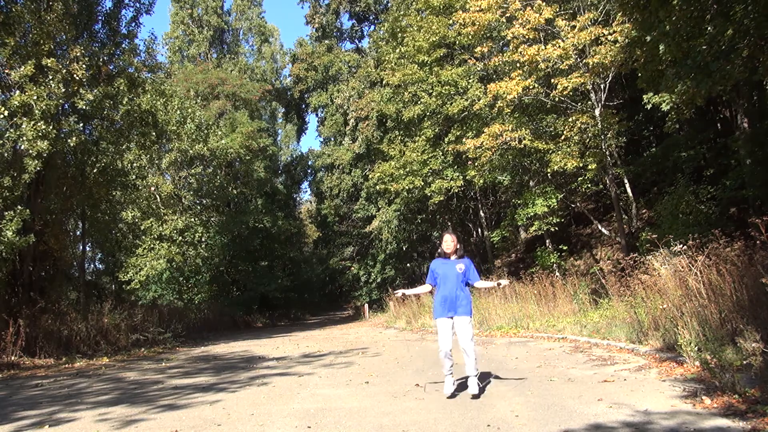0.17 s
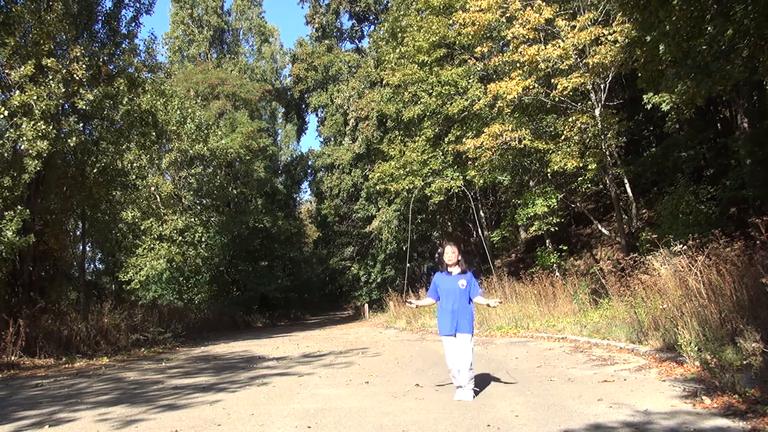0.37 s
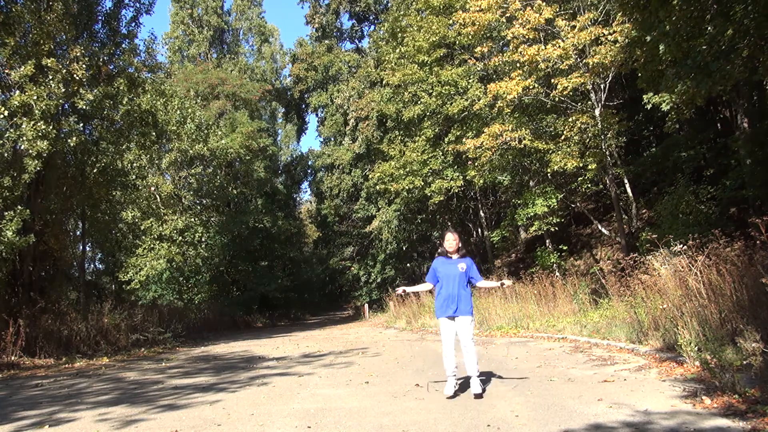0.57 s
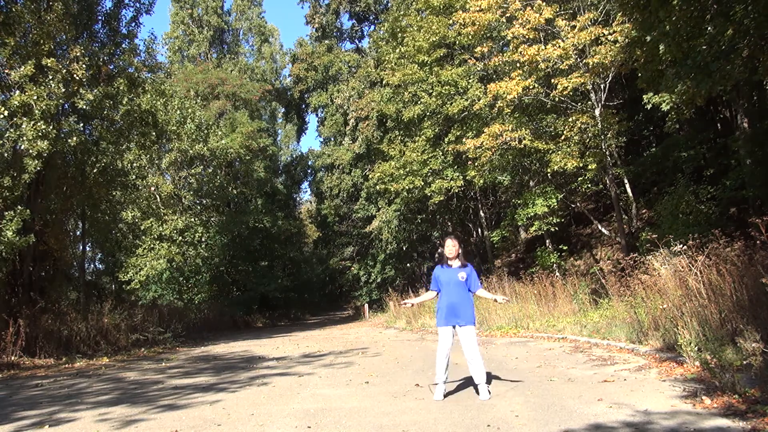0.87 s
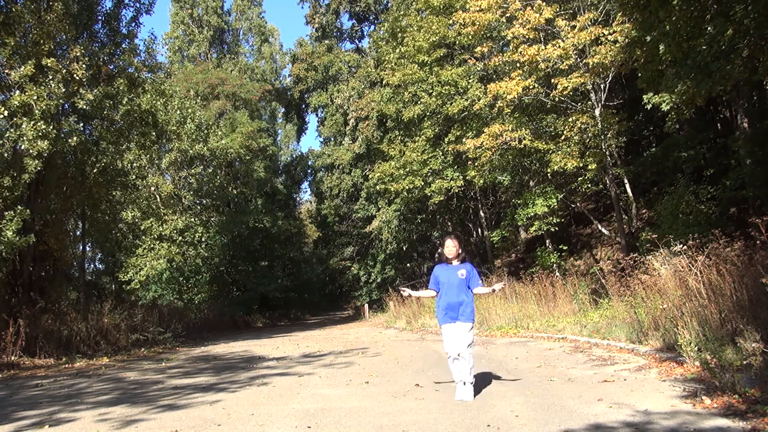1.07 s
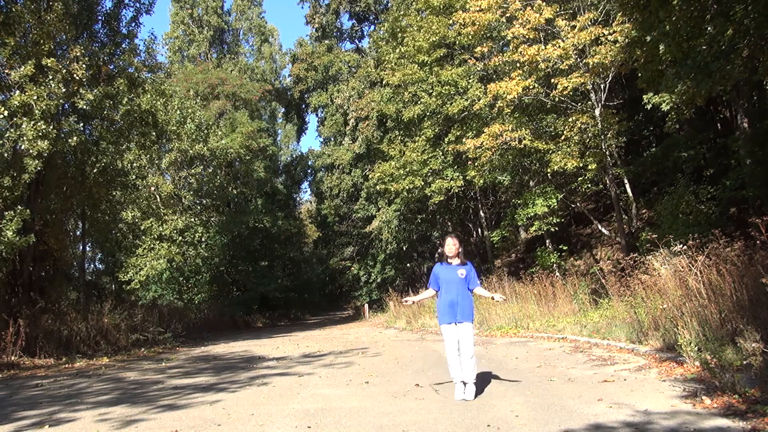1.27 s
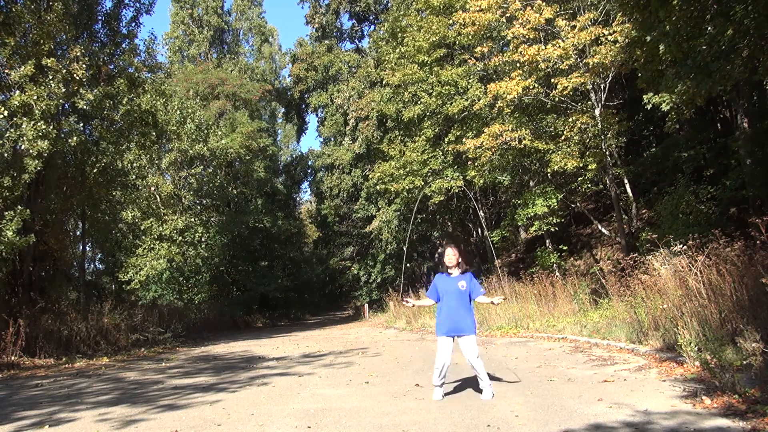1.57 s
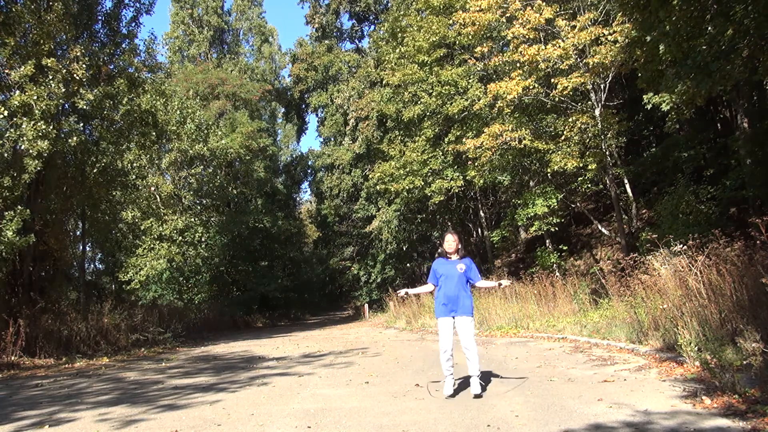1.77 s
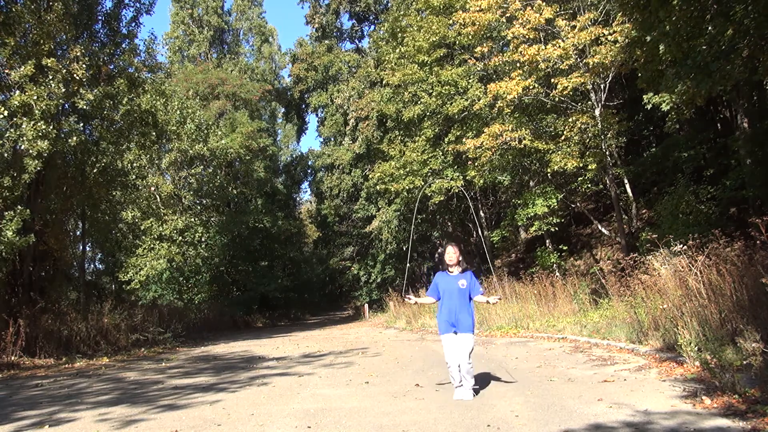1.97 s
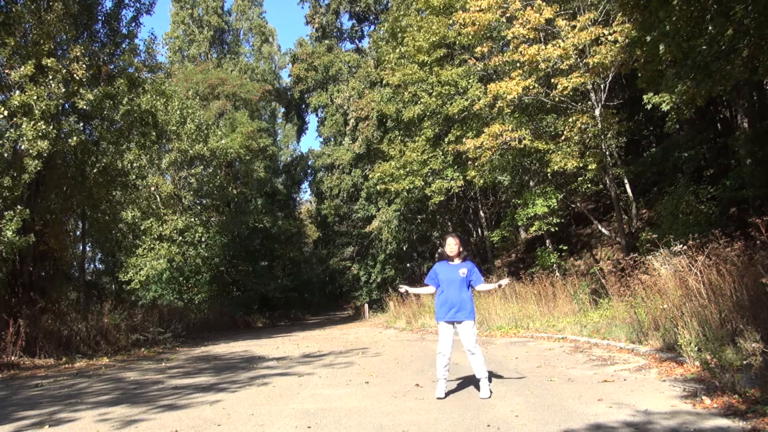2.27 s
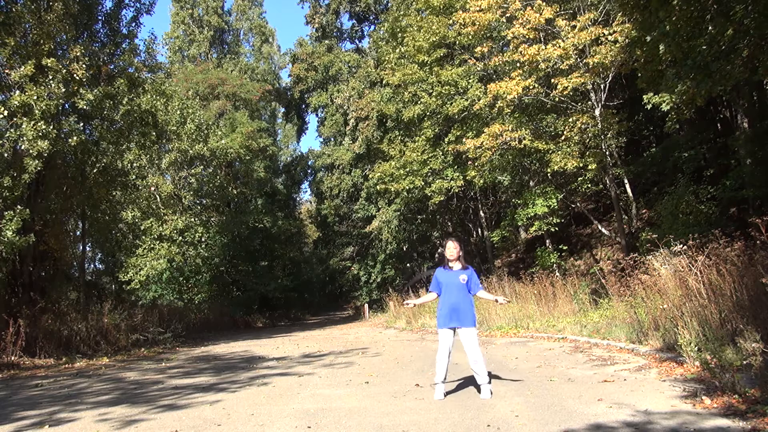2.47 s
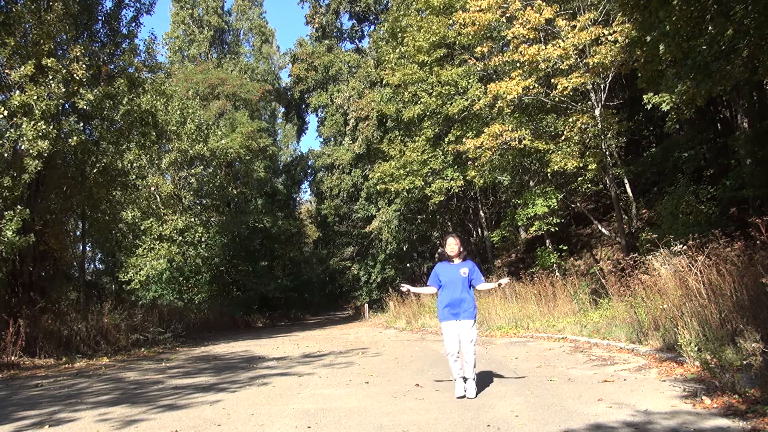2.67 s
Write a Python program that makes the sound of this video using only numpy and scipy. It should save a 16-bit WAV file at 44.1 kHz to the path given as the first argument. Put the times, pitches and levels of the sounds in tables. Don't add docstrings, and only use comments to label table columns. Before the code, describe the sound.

A skipping rope cracks on paving at about 0.17, 0.58, 0.98, 1.39, 1.79, 2.21 and 2.60 seconds, the fourth slap softest. Each is bright and short, with a tiny rattle and a faint wash from trees. The rope whistles waveringly between slaps; shoes tap, scuff and thud softly roughly 0.13 seconds after most slaps, strongest near 1.93. Low hum, leaves and slight hiss lie beneath; the right side is louder.

```python
import sys
import numpy as np
from scipy import signal
from scipy.fft import rfft, irfft
from scipy.io import wavfile

SR = 44100
rng = np.random.default_rng(int(sys.argv[2]) if len(sys.argv) > 2 else 0)


def attenuation_scalar(level_db):
    decades = np.asarray(level_db, float) / 20
    return 10 ** decades


def wrap_up_sound(samples):
    columns = np.atleast_2d(samples).T
    tamed = np.clip(columns, -1, 1)
    steps = np.round(tamed * 32767).astype(np.int16)
    wavfile.write(sys.argv[1], SR, steps)


N = 124362


def rms_one(x):
    return x / np.sqrt(np.mean(x ** 2) + 1e-20)


def at_hz(points, hz):
    table = np.array(points)
    return np.interp(np.log(hz), np.log(table[:, 0]), table[:, 1])


def drift(hz):
    r = np.exp(-2 * np.pi * hz / SR)
    wander = signal.lfilter([1], [1, -2 * r, r * r], rng.standard_normal(N + SR))
    return rms_one(wander[SR:])


def band(x, low_hz, high_hz):
    sos = signal.butter(2, [low_hz, min(high_hz, 0.45 * SR)], "band", fs=SR, output="sos")
    return signal.sosfilt(sos, x)


def ring(x, hz, width_hz):
    r, w = np.exp(-np.pi * width_hz / SR), 2 * np.pi * hz / SR
    return signal.lfilter([0, np.sin(w)], [1, -2 * r * np.cos(w), r * r], x + 1e-18)


# frequency in Hz, level in dB per Hz.
AIR_SPECTRUM = [(25, -16.5), (60, -11.5), (256, -10.5), (900, -13), (1940, -18.5), (8360, -42),
                (16000, -36.5)]
# frequency in Hz, correlation from -1 to 1.
AIR_LIKENESS = [(25, .4), (70, .55), (250, .96), (8000, .9)]


def air():
    AIR_DB, TOGETHER_DB, PATCH_DB = -49.5, 1.2, 1.53
    out, together = 0, drift(1.8)
    edges = 22 * 2 ** np.arange(0, 9.6, 0.5)
    white = rng.standard_normal((2, 2, N))
    for k, (low, high) in enumerate(zip(edges, edges[1:])):
        mid, side = band(white[k % 2], low, high)
        hz = np.sqrt(low * high)
        alike = np.clip(at_hz(AIR_LIKENESS, hz), -1, 1)
        stereo = np.sqrt(1 + alike) * mid + np.sqrt(1 - alike) * side * [[1], [-1]]
        level_db = at_hz(AIR_SPECTRUM, hz) + TOGETHER_DB * together + PATCH_DB * drift(11)
        out = out + attenuation_scalar(level_db) * stereo
    return attenuation_scalar(AIR_DB) * rms_one(out)


def trees(hits):
    NEAR_DB, NEAR_T60_S = -6, 0.022
    FAR_DB, FAR_T60_S = -27, 0.79
    LOW_HZ, HIGH_HZ, GRAIN_DB = 3100, 9547, 2.5
    t = np.arange(SR) / SR
    fade = attenuation_scalar(NEAR_DB - 60 * t / NEAR_T60_S) + attenuation_scalar(FAR_DB - 60 * t / FAR_T60_S)
    fade = fade * (t > 0.004) / 10
    power = signal.fftconvolve(band(hits, LOW_HZ, HIGH_HZ) ** 2, fade ** 2)[:N]
    level = np.sqrt(np.abs(power))
    mid, side = rng.standard_normal((2, N))
    wash = band(mid + 0.48 * side * [[1], [-1]], LOW_HZ, HIGH_HZ)
    return level * attenuation_scalar(GRAIN_DB * drift(120)) * wash


def ticks():
    PER_S, TICK_DB = 45, -33
    sizes = attenuation_scalar(TICK_DB + 4 * np.minimum(rng.exponential(1, N), 2))
    sizes = sizes * (rng.random(N) < PER_S / SR)
    return band(sizes * rng.choice([-1, 1], N), 830, 2800)


# start in seconds, length in
# seconds, level in dB.
SCUFF_EVENTS = [
    (-0.014, 0.21, -55.5),
    (0.29, 0.039, -52.5),
    (0.751, 0.054, -57),
    (1.095, 0.051, -55.5),
    (1.486, 0.072, -53),
    (1.884, 0.061, -50),
    (2.285, 0.13, -80),
    (2.723, 0.049, -64.5),
]


def scuffs():
    t = np.arange(N) / SR
    grains = rng.standard_normal(N) * attenuation_scalar(4 * drift(250))
    drag = 0
    for s, length, db in SCUFF_EVENTS:
        drag = drag + attenuation_scalar(db) * np.sin(np.pi * np.clip((t - s) / length, 0, 1))
    return drag * rms_one(band(grains, 398, 6400))


# start in seconds, peak level in dB, reference pitch in Hz (the push settles at 0.7 of
THUD_EVENTS = [(0.303, -35.5, 265), (0.315, -37, 263), (0.723, -35.5, 310), (0.7348, -29.5, 345),
               (1.109, -36.5, 260), (1.5354, -30.5, 281), (1.903, -29, 252.7), (1.9317, -26.5, 287),
               (2.338, -30, 291.2), (2.3498, -27, 316), (2.741, -30.5, 330), (2.754, -33, 255.8)]


def thuds():
    START_SHARE, FALL_S, SETTLE_SHARE, RINGS = 3.5, 0.0013, 0.7, 1.3
    out, t = np.zeros(N + SR), np.arange(2000) / SR
    for s, db, hz in THUD_EVENTS:
        cycles = SETTLE_SHARE * hz * (t + START_SHARE * FALL_S * (1 - np.exp(-t / FALL_S)))
        i = int(s * SR)
        out[i:i + len(t)] -= attenuation_scalar(db + 3.5 - 10 * t * hz / RINGS) * np.sin(2 * np.pi * cycles)
    return band(out[:N], 87, 2300)


def knocks(rows, cycles):
    ROUGH_DB = -8
    out, noise = np.zeros(N + SR), rng.standard_normal((len(rows), 4000))
    for (s, db, hz), rough in zip(rows, noise):
        u = np.arange(min(int(3 * cycles / hz * SR), 4000)) * hz / SR
        i = int((s - 0.59 / hz) * SR)
        burst = rms_one(band(rough, 1.2 * hz, 1.27 * hz))[:len(u)]
        wave = np.sin(2 * np.pi * u) + attenuation_scalar(ROUGH_DB) * burst
        out[i:i + len(u)] += attenuation_scalar(db + 7.5 - 30 * u / cycles) * (1 - np.exp(-u / 0.27)) * wave
    return out[:N]


# peak time in seconds, peak level in dB, pitch in Hz.
TAP_EVENTS = [(0.0631, -30, 2270), (.3022, -40.5, 2320), (.3158, -36, 1480), (.3736, -40, 2150),
              (.3975, -40.5, 1700), (.4614, -38, 2406), (0.5097, -40.5, 1706), (0.7068, -39, 2510),
              (0.7239, -32.5, 2230), (0.7736, -27.5, 2075), (.7772, -33, 1587), (0.7824, -38.5, 2430),
              (.8694, -63, 1675), (1.0706, -37.5, 1723), (1.1127, -36, 2128), (1.197, -36.5, 1677),
              (1.4556, -48.5, 2000), (1.4871, -27.5, 1890), (1.4953, -34, 2315), (1.4975, -35, 2360),
              (1.5028, -40, 2020), (1.5046, -35, 2520), (1.5091, -29, 2220), (1.5132, -28, 2270),
              (1.5265, -34.5, 1570), (1.5361, -33, 1580), (1.5633, -39, 1910), (1.6468, -34.5, 2430),
              (1.8176, -34.5, 1953), (1.8582, -35, 1940), (1.9029, -28, 1730), (1.9213, -37, 2300),
              (1.9332, -19.5, 1630), (2.0517, -33, 1767), (2.2858, -39.5, 2182), (2.2911, -31.5, 2002),
              (2.3377, -32.5, 1860), (2.3487, -36.5, 2583), (2.5832, -34.5, 1513), (2.6359, -22.5, 1292),
              (2.7393, -32, 1720), (2.7543, -31.5, 1483), (2.758, -35, 1711)]
# peak time in seconds, peak level in dB, pitch in Hz.
GRIT_EVENTS = [(.287, -39, 6480), (0.2958, -33.5, 9450), (.2978, -36, 6192), (0.3343, -38, 7165),
               (.7239, -40, 5970), (.7824, -43, 5535), (1.4953, -37, 6540), (1.5265, -50, 4500),
               (1.5361, -47, 6500), (1.9028, -35, 5684), (1.9213, -35.5, 6400), (1.9328, -27.5, 6100),
               (2.3376, -35, 5500), (2.3487, -33.5, 6296), (2.7354, -36, 9560), (2.7393, -38.5, 6584)]


def feet():
    return knocks(TAP_EVENTS, cycles=3.8) + knocks(GRIT_EVENTS, cycles=2.8) + thuds() + scuffs()


SLAP_TIMES = [
    -.23,
    .1745,
    .581,
    .9775,
    1.391,
    1.7914,
    2.2092,
    2.6005,
    3.0,
]
# share of the turn from 0 to 1, pitch in Hz, level in dB.
TURN_TONE = [(0, 595.2, -47.5), (0.058, 507.6, -53.5), (0.219, 494.8, -49), (0.448, 573.8, -49.5),
             (0.62, 530.2, -54.5), (.78, 586.9, -47), (1, 612.7, -45.5)]
# peak time in seconds, peak level in dB, pitch in Hz, length in seconds.
EDDY_SWELLS = [(0.007, -33.5, 541.7, 0.014), (0.048, -38.5, 525, 0.015), (0.075, -30.5, 592.7, 0.02),
               (0.104, -29.5, 622, 0.0076), (0.138, -33, 581.4, 0.022), (0.157, -28, 705, 0.0068),
               (0.251, -37.0, 496.0, 0.022), (0.287, -39.5, 532, 0.0087), (0.356, -39.5, 620, 0.011),
               (0.462, -39, 542.2, 0.013), (0.489, -30.5, 622, 0.006), (0.551, -29.0, 576, 0.01),
               (0.628, -42, 485.4, 0.012), (0.679, -34, 512.2, 0.015), (0.871, -40.5, 562.2, 0.029),
               (0.897, -41, 585.2, 0.013), (0.939, -31.5, 555, 0.022), (0.97, -36.5, 600.5, 0.014),
               (1.065, -37.0, 521.6, 0.014), (1.092, -42, 505.7, 0.018), (1.196, -35.5, 536.0, 0.0085),
               (1.245, -48, 523, 0.032), (1.283, -40, 542.2, 0.015), (1.316, -43, 609, 0.015),
               (1.369, -33.5, 591.6, 0.0083), (1.393, -35, 547, 0.018), (1.486, -35, 521.2, 0.017),
               (1.509, -38, 523.5, 0.025), (1.593, -38.0, 568, 0.013), (1.61, -33.5, 591, 0.0061),
               (1.72, -33.5, 598.2, 0.013), (1.743, -36.5, 554.3, 0.01), (1.764, -33.5, 593.6, 0.021),
               (1.787, -39, 605.3, 0.03), (1.848, -38.5, 496.7, 0.034), (1.882, -39, 526.5, 0.022),
               (1.912, -31, 531, 0.011), (2.1, -33.5, 545, 0.021), (2.129, -39, 620, 0.013),
               (2.153, -40.5, 576.3, 0.028), (2.194, -40.5, 624, 0.027), (2.275, -42, 504.7, 0.073),
               (2.321, -35.5, 523.7, 0.015), (2.374, -40.5, 555.0, 0.027), (2.423, -35.5, 571, 0.0055),
               (2.517, -35.5, 584.4, 0.025), (2.573, -30, 604.4, 0.023), (2.666, -33.5, 543, 0.0091),
               (2.687, -32.5, 504, 0.021), (2.786, -40.5, 554.6, 0.016)]


def whistle():
    TONE_WIDTH_HZ, SWISH_DB, BRIGHT_SWISH_DB, WISP_DB = 49.4, -14, -17.5, 2.4
    WOBBLE_RADIANS, SWELL_OVERTONE_DB, LINK_DB = 0.62, -18, 3
    t = np.arange(N) / SR
    turn = np.interp(t, SLAP_TIMES, np.arange(len(SLAP_TIMES))) % 1
    share, hz, db = np.transpose(TURN_TONE)
    pitch, level = np.interp(turn, share, hz), attenuation_scalar(np.interp(turn, share, db))
    phase = 2 * np.pi * np.cumsum(pitch) / SR

    tone = 0
    for ratio, partial_db in ((1, 0), (2, -18), (1.17, -9)):
        width = TONE_WIDTH_HZ * ratio
        blurred = drift(width) * np.cos(ratio * phase) + drift(width) * np.sin(ratio * phase)
        tone = tone + attenuation_scalar(partial_db) * blurred
    swish = attenuation_scalar(SWISH_DB + WISP_DB * drift(14)) * rms_one(band(rng.standard_normal(N), 300, 3300))
    swish += attenuation_scalar(BRIGHT_SWISH_DB) * rms_one(band(rng.standard_normal(N), 2300, 9900))

    wobble = WOBBLE_RADIANS * drift(60)
    s, db, hz, length = np.transpose(EDDY_SWELLS)[:, :, None]
    spread = length * np.where(t < s, 0.48, 0.62)
    power = attenuation_scalar(2 * db) * np.exp(-((t - s) / spread) ** 2)
    link = attenuation_scalar(LINK_DB) * level ** 2
    total = power.sum(axis=0) + link
    glide_hz = ((power * hz).sum(axis=0) + link * pitch) / total
    glide = 2 * np.pi * np.cumsum(glide_hz) / SR
    orderly = np.sin(glide + wobble) + attenuation_scalar(SWELL_OVERTONE_DB) * np.sin(2 * glide + 3 * wobble)
    return level * (tone + swish) + np.sqrt(total) * orderly


# time in seconds, peak level in dB.
ROPE_CONTACTS = [(0.1745, -3), (0.1753, -17), (0.1762, -16), (0.1771, -21), (0.1782, -19), (0.179, -13),
                 (0.1795, -20), (0.1829, -20), (0.1844, -18), (0.1856, -25), (0.581, -3), (0.5828, -16),
                 (0.5921, -23), (0.5955, -24), (0.9776, -4), (0.978, -12), (0.9787, -14), (0.98, -18),
                 (0.9805, -12), (0.982, -23), (0.9836, -16), (0.986, -20), (1.3912, -10), (1.3919, -11),
                 (1.3929, -16), (1.3948, -20), (1.3963, -18), (1.3977, -18), (1.3982, -18), (1.3995, -21),
                 (1.4184, -26), (1.4191, -18), (1.7915, -4), (1.7922, -19), (1.7932, -19), (1.794, -20),
                 (1.7956, -21), (1.7966, -14), (1.798, -22), (1.7995, -22), (1.8005, -18), (1.8021, -11),
                 (2.2093, -7), (2.2103, -18), (2.2108, -17), (2.2121, -18), (2.2127, -22), (2.2132, -20),
                 (2.2161, -24), (2.2171, -24), (2.2223, -26), (2.2235, -21), (2.6007, -3), (2.6019, -7),
                 (2.6027, -20), (2.6045, -19), (2.6076, -16), (2.6082, -20), (2.6119, -25), (2.6252, -31)]
# length in seconds, level in dB, crack pitch in Hz, crack width in Hz,
# body pitch in Hz.
SLAP_RATTLE = [
    (0.013, -20.5, 7060, 3500, 3900),
    (0.0095, -21.5, 7560, 2700, 2860),
    (0.0067, -12.5, 7200, 3900, 1900),
    (0.01, -22.5, 6830, 2300, 3850),
    (0.014, -25.5, 7920, 2250, 4900),
    (0.014, -25, 7200, 3830, 3400),
    (0.0079, -15.5, 7700, 2540, 2450),
]


def slaps():
    CRACK_DB, BODY_DB, BODY_WIDTH_HZ, CONTACT_LOSS_DB = 3, -10.5, 2300, 2
    RATTLE_PER_S, FADE_DB, SPREAD_DB = 8000, 8, 3
    t, hits, out = np.arange(N) / SR, np.zeros(N), 0
    sizes = attenuation_scalar(SPREAD_DB * np.minimum(rng.exponential(1, N), 3) - 6)
    sizes = sizes * (rng.random(N) < RATTLE_PER_S / SR) * rng.choice([-1, 1], N)
    s, db = np.transpose(ROPE_CONTACTS)
    hits[(s * SR).astype(int) - 4] = attenuation_scalar(db - CONTACT_LOSS_DB * (db < -9))
    for start, (length, db, hz, width_hz, body_hz) in zip(SLAP_TIMES[1:], SLAP_RATTLE):
        share = (t - start) / length
        fade_db = FADE_DB * np.clip(share, 0, 1) + 20 * np.clip(share - 1, 0, 4)
        onset = (t > start - 0.002) * np.where(share > 0, 1, 0.2)
        clicks = sizes * attenuation_scalar(db - fade_db - 6) * onset
        clicks = (clicks + hits) * (abs(t - start) < 0.1)
        crack = ring(clicks, hz, width_hz)
        out = out + crack + attenuation_scalar(BODY_DB) * ring(clicks, body_hz, BODY_WIDTH_HZ)
    return -attenuation_scalar(CRACK_DB) * band(band(out, 1320, 10800), 1330, 13400)


def scene():
    hits = slaps() + feet() + ticks()
    return hits + whistle() + trees(hits) + air()


def top_cut(x):
    return signal.sosfilt(signal.butter(12, 16480, fs=SR, output="sos"), x)


# frequency in Hz, level in dB, lag in radians.
LEFT_MICROPHONE = [(400, -4.7, 0), (1100, -6.6, 0), (2600, -6.6, 0), (5000, -3.3, .2), (9000, -5, 1.1),
                   (11500, -11, .7), (13500, -14, .2)]


def record(dry):
    RIGHT_DB, HISS_DB, WHINE_HZ, WHINE_DB = 4, -65.5, 15734, -73
    CEILING, CUTOFF_HZ = 1.1, 16450
    hz = np.maximum(np.fft.rfftfreq(N, 1 / SR), 1)
    points, _, lag = np.transpose(LEFT_MICROPHONE)
    response = attenuation_scalar(at_hz(LEFT_MICROPHONE, hz)) * np.exp(-1j * np.interp(hz, points, lag))
    left = irfft(rfft(dry[0]) * response, N)
    hiss = attenuation_scalar(HISS_DB) * rms_one(band(rng.standard_normal(N), 5700, 22000))
    hiss += attenuation_scalar(WHINE_DB) * np.sin(2 * np.pi * WHINE_HZ * np.arange(N) / SR)
    x = attenuation_scalar(RIGHT_DB) * np.array([left, dry[1]]) + hiss * [[-0.25], [1]]
    x = CEILING * np.tanh(x / CEILING)
    mix = signal.sosfilt(signal.cheby2(8, 40, CUTOFF_HZ, fs=SR, output="sos"), x)
    return top_cut(mix)


dry = scene()
out = record(dry)
wrap_up_sound(out)
```